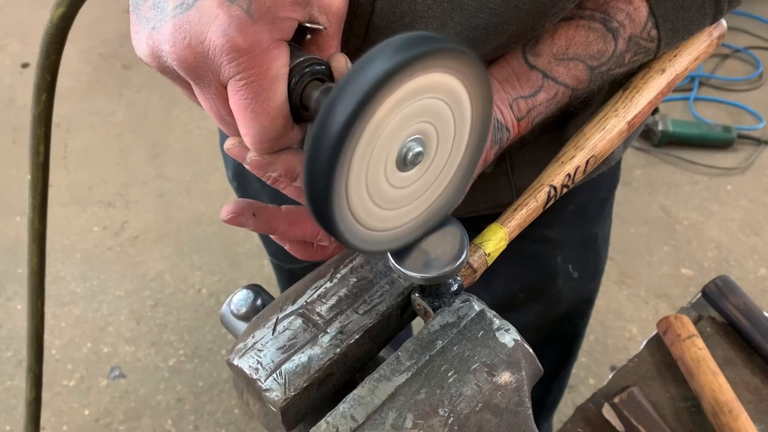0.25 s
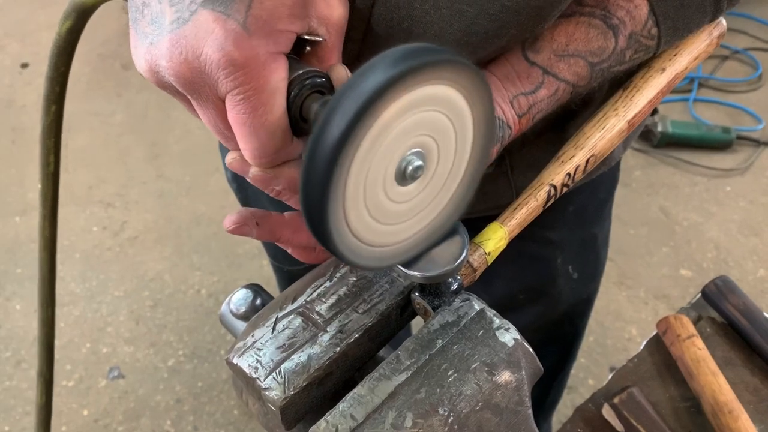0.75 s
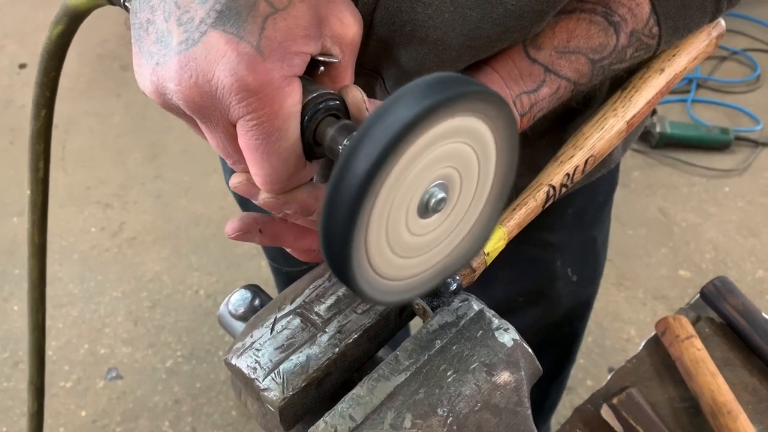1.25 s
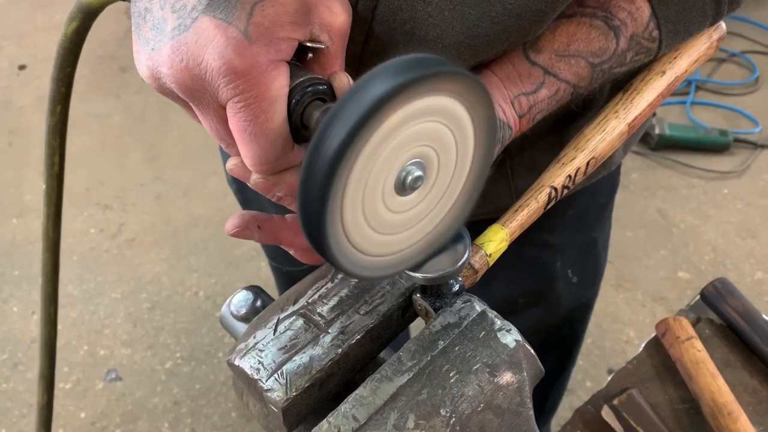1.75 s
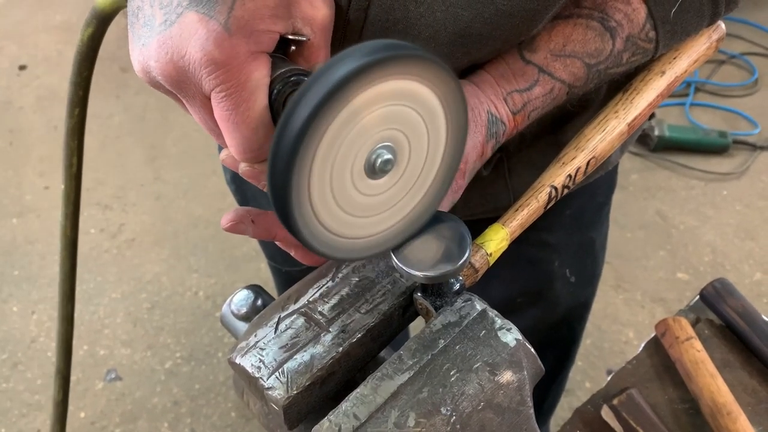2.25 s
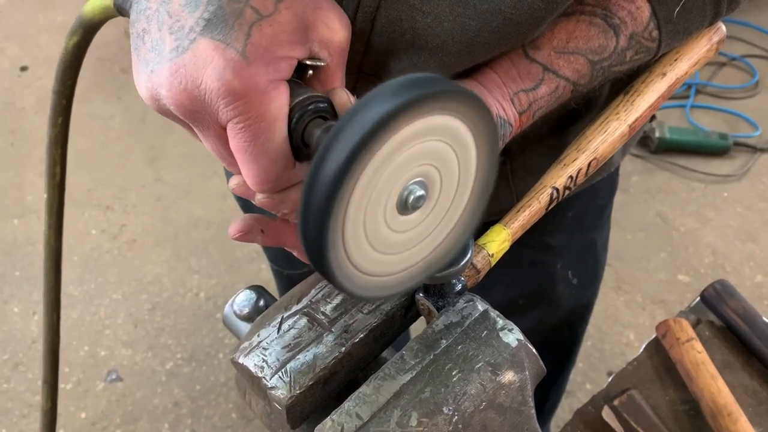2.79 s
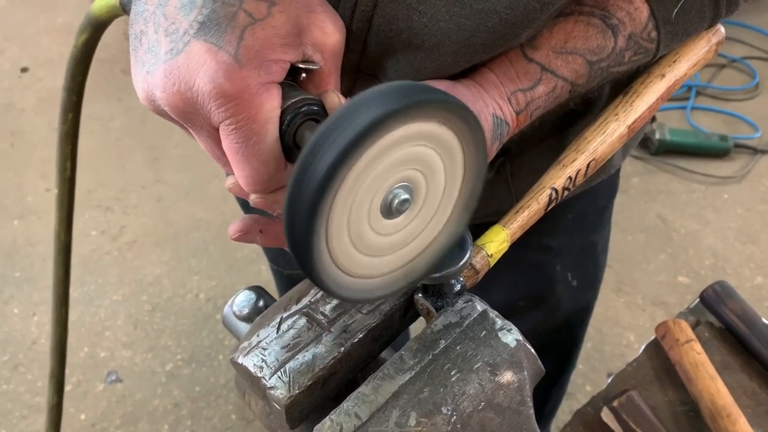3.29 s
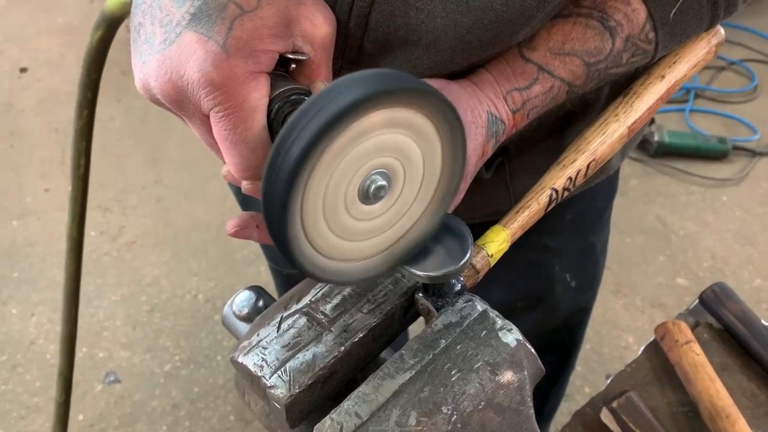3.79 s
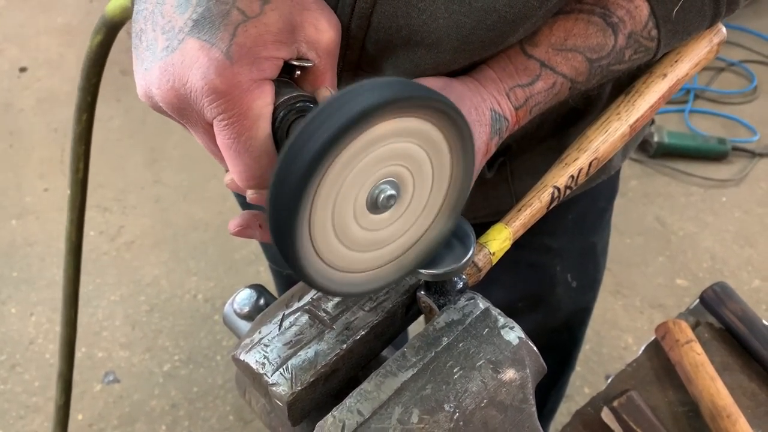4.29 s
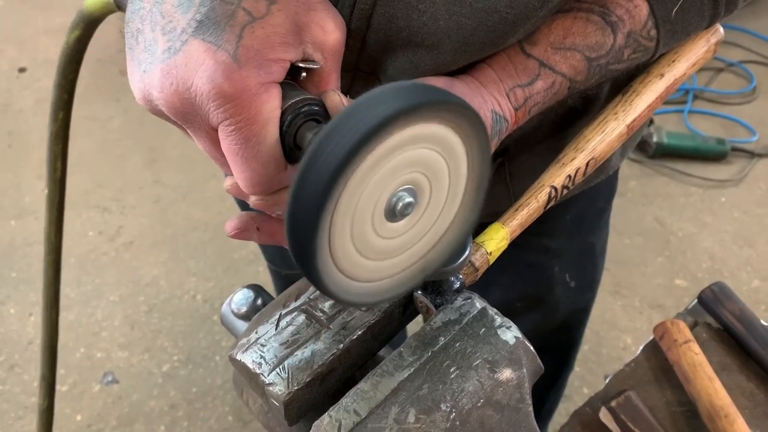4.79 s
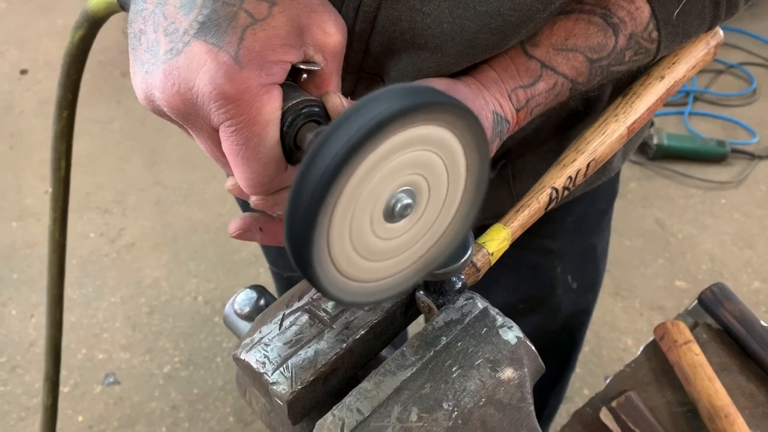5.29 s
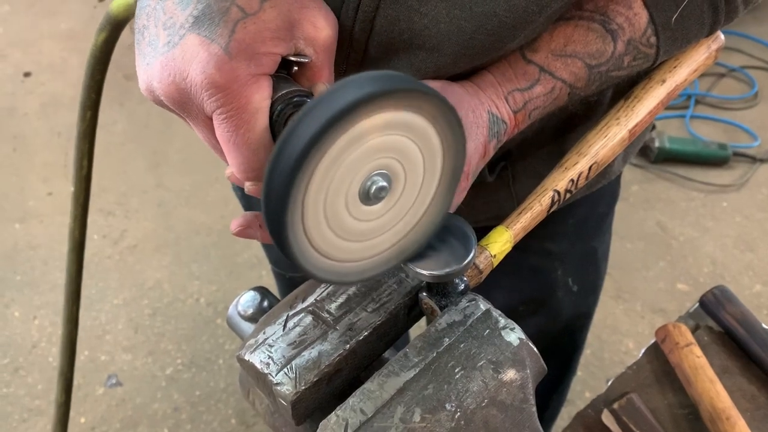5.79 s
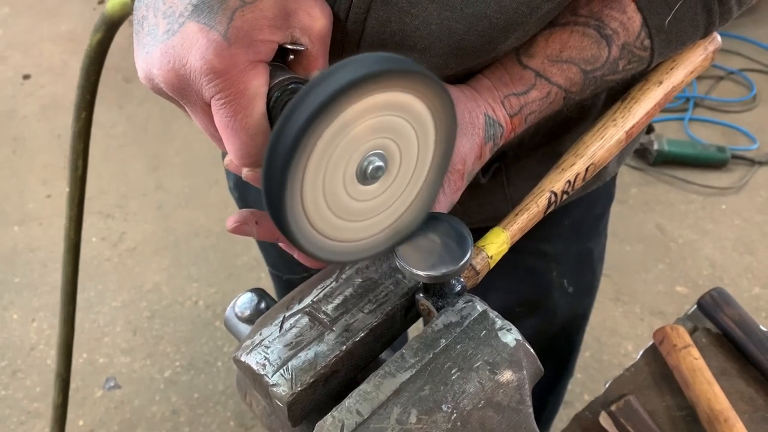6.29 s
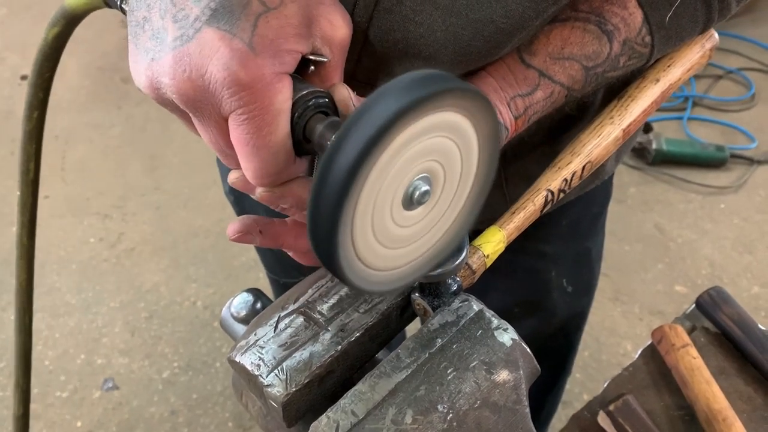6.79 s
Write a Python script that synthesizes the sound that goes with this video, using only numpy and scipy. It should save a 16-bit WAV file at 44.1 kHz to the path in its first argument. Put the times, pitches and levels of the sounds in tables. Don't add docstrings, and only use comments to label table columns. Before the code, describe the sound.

Continuous pneumatic grinder at close range, already running at the start and still running at the end. A hollow motor drone glides through repeated dips and rises, turning rough and lumpy when the buffing wheel digs into clamped steel. High, piercing air hiss pulses rapidly with the motor, with dry cloth friction and low vice rumble beneath. A phone's wide stereo pickup in a lightly reverberant workshop.

```python
import sys
import numpy as np
from scipy import signal
from scipy.fft import rfft, irfft, next_fast_len
from scipy.io import wavfile
from scipy.ndimage import uniform_filter1d

SR = 44100
rng = np.random.default_rng(int(sys.argv[2]) if len(sys.argv) > 2 else 0)


def invert_db(level):
    return 10 ** (np.asarray(level, dtype=float) / 20)


def transcribe(signal):
    frames = np.atleast_2d(signal).T
    limited = np.clip(frames, -1, 1)
    pcm = np.round(limited * 32767).astype(np.int16)
    wavfile.write(sys.argv[1], SR, pcm)


N = 310905
TIME = np.arange(N) / SR
SIZE = next_fast_len(N)
STEP = 64

# (time [s], drag [share of stall torque], time the move takes [s])
LEANS = [(0.0, 0.502, 0.022), (0.06, 0.331, 0.036), (0.226, 0.261, 0.023), (0.487, 0.523, 0.134),
         (0.68, 0.342, 0.057), (0.956, 0.56, 0.176), (1.162, 1.146, 0.114), (1.379, 0.171, 0.163),
         (1.796, 0.065, 0.025), (2.278, 1.356, 0.113), (2.423, 0.0, 0.164), (2.597, 0.74, 0.065),
         (2.774, 1.47, 0.085), (2.872, 0.788, 0.129), (3.139, 0.943, 0.29), (3.617, 0.604, 0.261),
         (3.995, 1.071, 0.108), (4.156, 0.668, 0.148), (4.359, 0.776, 0.034), (4.463, 0.542, 0.114),
         (4.81, 0.056, 0.112), (5.027, 0.671, 0.045), (5.288, 0.501, 0.028), (5.519, 0.857, 0.104),
         (5.734, 0.125, 0.161), (5.909, 0.444, 0.17), (6.234, 0.288, 0.028), (6.3, 0.922, 0.116),
         (6.532, 0.115, 0.051), (6.691, 0.837, 0.324)]
# (frequency [Hz], width [Hz], signed gain [ratio])
BODY_MODES = [(174.7, 60, 0.75), (221.3, 14.5, -0.3), (252.3, 75, -2), (312.8, 218, 1.64),
              (447.0, 30, 0.54), (622.7, 250.6, -5), (627.5, 186.5, 5), (795, 125, 0.54), (1010, 76, 0.48),
              (1175, 18, 0.3), (1176.0, 240, 0.59), (1450, 166, -1.38), (1805, 120, 0.27),
              (2170, 49.0, -0.4)]
# (level before the body [dB], slope with speed [dB per octave])
VANE_PARTIALS = [(-34.5, 0.2), (-42, -0.76), (-46, 1), (-52.0, 2.5), (-60, 20), (-55, 7.5), (-55.5, 5),
                 (-58.5, 9), (-70, 6.5)]
# (frequency [Hz], level [dB])
ACROSS_PORTS = [(150, -28), (250, -22.5), (500, -12.5), (800, -13.5), (1000, -10), (1300, -5.5),
                (1700, -4.5), (2400, -8)]
# (frequency [Hz], level [dB rms])
SHAFT_LINES = [(40, -73), (75, -71.5), (150, -64), (230, -69.5), (450, -74.5), (800, -69.5), (1200, -70),
               (1700, -72.5), (2500, -81)]
# (frequency [Hz], level [dB per Hz])
JET_SPECTRUM = [(1500, -22), (2200, -17), (2900, -12), (3300, -11), (4000, -8), (5500, -9), (6500, -4.5),
                (7500, -3), (8600, 0), (10000, -1), (11000, -1.5), (12500, -2), (14000, -4.5), (15800, -6)]
# (time [s], level [dB])
JET_AIM = [(0.0, -36.5), (0.55, -39), (1.0, -36.5), (1.47, -36), (1.65, -38), (2.24, -39), (2.92, -38.5),
           (3.55, -39.5), (3.95, -38), (4.53, -38), (4.99, -36.5), (5.3, -37), (5.65, -38.5), (6.5, -38),
           (6.71, -37), (6.91, -35), (6.95, -35), (7.05, -36)]
# (frequency [Hz], level [dB per Hz])
RUB_SPECTRUM = [(25, -30), (60, -24), (150, -20), (300, -12), (480, -17), (750, -15), (1100, -6.5),
                (1450, -7.5), (1700, -14.5), (2600, -15)]
# (frequency [Hz], level [dB per Hz])
SHUDDER_SPECTRUM = [(30, 2), (60, -8), (120, 3), (250, 1), (400, -5.5), (800, -18.5)]
# (time [s], tilt [0-1])
WHEEL_TILT = [(0, .35), (.4, .1), (1.0, 0), (1.8, .1), (2.2, .7), (2.5, .7), (2.8, .2), (3.2, .2), (3.6, 1),
              (4.1, 1), (5.0, .05), (5.4, .3), (5.8, 1), (6.4, .65), (6.8, 0), (7.05, .15)]
# (off the wheel [ms], off the vice [ms])
ECHO_DELAYS = (.43, .37)
# (frequency [Hz], lead of left [rad], share common to both [0-1], left minus right [dB])
PORT_RESPONSE = [(0, 0, .99, .8), (450, .25, .97, 0), (800, .6, .3, 2.5), (1300, .95, .9, -.6),
                 (2250, 2.3, .2, 2.5), (2700, 2.85, .93, 0), (3250, 3.5, .9, 0), (3550, 5.0, .5, 0),
                 (4200, 6.2, .88, 0), (5600, 6.0, .4, -1.5), (6800, 6.4, .78, .3), (7700, 5.4, .5, 3),
                 (8450, 3.55, .93, -.8), (8850, 2.75, .92, 0), (9300, 1.8, .9, 1.5), (10200, 0, .97, 0),
                 (14900, -9.3, .97, 0), (15250, -9.8, .95, 0), (15500, -11.4, .7, 0)]

VANES = 4
FREE_HZ, START_HZ, SPIN_UP_S = 473.0, 228.7, .4295
JUDDER, JUDDER_HZ = .006, 14
ACROSS_DB_PER_OCTAVE, ACROSS_RAD = -1, 1.48
LEAK_DB = -5
LOWER_DB, LOWER_FOLLOWS = -1.0, .25
TOP_DB, TOP_FOLLOWS = -2.5, .8
SHADE_DB = -0.6
RUB_DB, RUB_DB_PER_LOAD = -53, 0.5
WHEEL_ECHO, VICE_ECHO = 0.067, 0.052
ROOM_T60_S, ROOM_DB = .45, -14.5


def motor_speed():
    start, drag, move = np.transpose(LEANS)
    s = TIME[::STEP]
    progress = np.clip((s - start[1:, None]) / move[1:, None], 0, 1)
    drag_now = drag[0] + np.diff(drag) @ progress
    keep = np.exp(-STEP / SR / SPIN_UP_S)
    hz = signal.lfilter([1 - keep], [1, -keep], FREE_HZ * (1 - drag_now), zi=[keep * START_HZ])[0]
    return np.interp(TIME, s, hz)


def vane_levels(hz):
    f = np.arange(20, 2600)
    body = sum(gain * 1j * f * width / (mode ** 2 - f ** 2 + 1j * f * width)
               for mode, width, gain in BODY_MODES)
    leak = invert_db(shape_db(ACROSS_PORTS, f) + LEAK_DB)
    body_db = 20 * np.log10(np.hypot(np.abs(body), leak))
    octaves = np.log2(hz / 250)
    shared_db, across_db = [], []
    for k, (db, slope) in enumerate(VANE_PARTIALS, 1):
        puff_db = db + slope * octaves
        shared_db.append(puff_db + np.interp(k * hz, f, body_db))
        across_db.append(puff_db + shape_db(ACROSS_PORTS, k * hz) + ACROSS_DB_PER_OCTAVE * octaves)
    return shared_db, across_db


def whine(hz, turn, load):
    hz, load = hz[::STEP], load[::STEP]
    vane_db, across_db = vane_levels(hz)
    shaft, vanes, across = np.zeros((3, N))
    for k in range(1, len(vane_db) * VANES + 1):
        is_vane_line = k % VANES == 0
        flicker_db = .6 if k == VANES else 1.2 if is_vane_line else 2.0
        flicker = np.sqrt(2) * invert_db(flicker_db * walk(22, sr=SR / STEP)[:len(hz)])
        phase = k * turn
        if k != VANES:
            phase = phase + 2 * np.pi * rng.random()
        if is_vane_line:
            n = k // VANES - 1
            vanes += smooth(invert_db(vane_db[n]) * flicker) * np.cos(phase)
            across += smooth(invert_db(across_db[n]) * flicker) * np.cos(phase + ACROSS_RAD)
        else:
            nearest_db = vane_db[int(np.clip(round(k / VANES), 1, len(vane_db))) - 1]
            lumpy_db = nearest_db - 40.0 + 21.0 * load - 10.0 * (k < 3)
            steady_db = shape_db(SHAFT_LINES, hz * k / VANES) + 9.3 * np.log2(hz / 270)
            shaft += smooth(np.hypot(invert_db(steady_db), invert_db(lumpy_db)) * flicker) * np.cos(phase)
    return irfft(ports(shaft)[0], SIZE)[:, :N] + vanes + np.array([across, -across])


def jet(turn, level_db, lower_db, top_db):
    vane = (VANES * turn / (2 * np.pi) + .4).astype(int)
    strength = invert_db(2.2 * rng.standard_normal(vane[-1] + 1))[vane]
    puff = strength * (1 + np.cos(VANES * turn - .6)) / 2
    eddies_db = .5 * walk(60)
    bands = ((1000, 7560, lower_db - 33.0, 0.44),
             (8360, 11150, -33.5, 0.84),
             (11750, 16000, top_db - 31.5, .65))
    out = 0
    for lo_hz, hi_hz, db, throb in bands:
        swell = (1 + throb * puff) * invert_db(eddies_db + 0.19 * walk(40))
        spectra, hz = air(JET_SPECTRUM, swell)
        band_power = (1 + np.tanh((hz - lo_hz) / 500)) * (1 - np.tanh((hz - hi_hz) / 500)) / 4
        out = out + invert_db(level_db + 41.0 + db) * irfft(spectra * np.sqrt(band_power), SIZE)[:, :N]
    return out


def rub(turn, load, level_db):
    swell = (1 + .2 * np.cos(turn)) * invert_db(1.5 * walk(40))
    drag = irfft(air(RUB_SPECTRUM, swell)[0], SIZE)[:, :N]
    shudder = irfft(air(SHUDDER_SPECTRUM, swell)[0], SIZE)[:, :N]
    return invert_db(level_db) * drag + invert_db(-69.5 + 17.6 * load ** 0.94) * shudder


def echoes(hiss):
    hz = np.fft.rfftfreq(SIZE, 1 / SR)
    tilt = curves(WHEEL_TILT)[0]
    out = hiss
    for share, ms in zip((WHEEL_ECHO * tilt, VICE_ECHO * (1 - tilt)), ECHO_DELAYS):
        delay = np.exp(-2j * np.pi * hz * ms / 1000)
        out = out + share * irfft(rfft(hiss, SIZE) * delay, SIZE)[:, :N]
    return out


def room(sound):
    s = np.arange(int(.5 * SR)) / SR
    decay = invert_db(-60 * s / ROOM_T60_S) * (s > .006)
    tail = ports(*(rng.standard_normal((3, len(s))) * decay))[0]
    tail = tail / np.sqrt(np.mean(np.abs(tail) ** 2))
    return sound + invert_db(ROOM_DB) * irfft(rfft(sound.mean(axis=0), SIZE) * tail, SIZE)[:, :N]


def air(points, swell):
    spectra, hz = ports(*(swell * rng.standard_normal((3, N))))
    spectra = spectra * invert_db(shape_db(points, hz))
    power = np.mean(np.sum(np.abs(spectra) ** 2, axis=1))
    return spectra * SIZE / np.sqrt(2 * power), hz


def ports(common, left=None, right=None):
    hz = np.fft.rfftfreq(SIZE, 1 / SR)
    f, *columns = np.transpose(PORT_RESPONSE)
    lead, share, pan_db = (np.interp(hz, f, c) for c in columns)
    side = np.array([[1], [-1]])
    out = rfft(common, SIZE) * np.exp(.5j * side * lead)
    if left is not None:
        share = np.clip(share, 0, 1)
        alone = rfft(np.array([left, right]), SIZE)
        out = np.sqrt(share) * out + np.sqrt(1 - share) * alone
    return out * invert_db(side * pan_db / 2), hz


def walk(rate, sr=SR):
    k, count = int(sr / rate), int(N * sr / SR) + 1
    held = np.repeat(rng.standard_normal(count // k + 1), k)
    slewed = uniform_filter1d(uniform_filter1d(held, k), k)
    return 1.17 * slewed[:min(count, N)]


def shape_db(points, hz):
    f, db = np.transpose(points)
    outside = np.abs(np.log((hz + 1) / np.clip(hz + 1, f[0], f[-1])))
    return np.interp(np.log(hz + 1), np.log(f), db) - 30 * outside


def curves(table):
    s, *columns = np.transpose(table)
    return [np.interp(TIME, s, c) for c in columns]


def smooth(slow):
    return np.interp(TIME, TIME[::STEP], slow)


def scene():
    hz = motor_speed()
    load = np.clip(np.log2(230 / hz), 0, 1.2)
    unsteady = 1 + 0.00206 * walk(60) + JUDDER * load * walk(JUDDER_HZ)
    turn = 2 * np.pi * np.cumsum(hz * unsteady) / (VANES * SR)

    level_db = curves(JET_AIM)[0]
    swing_db = level_db - level_db.mean()
    lower_db = LOWER_DB + SHADE_DB * curves(WHEEL_TILT)[0] - (1 - LOWER_FOLLOWS) * swing_db
    top_db = TOP_DB - (1 - TOP_FOLLOWS) * swing_db
    hiss = echoes(jet(turn, level_db, lower_db, top_db))
    return room(whine(hz, turn, load)) + hiss + rub(turn, load, RUB_DB + RUB_DB_PER_LOAD * load)


def band_limit(x):
    return signal.sosfilt(signal.butter(12, 15800, fs=SR, output="sos"), x)


def record(dry):
    highpass = signal.butter(3, 48, "highpass", fs=SR, output="sos")
    trimmed = signal.sosfilt(highpass, dry)
    return band_limit(trimmed)


dry = scene()
out = record(dry)
transcribe(out)
```